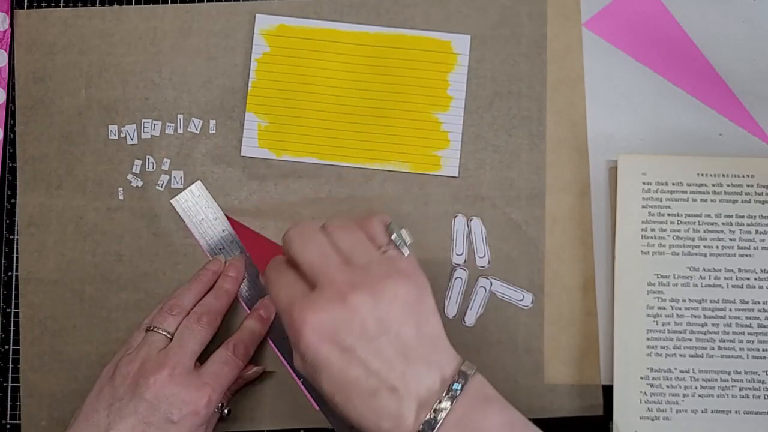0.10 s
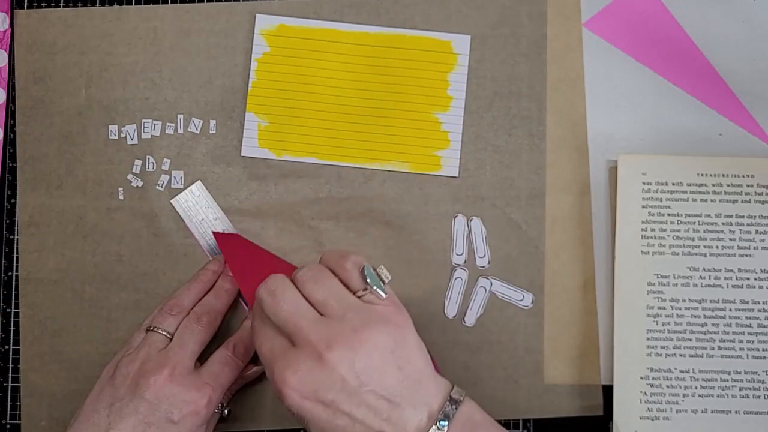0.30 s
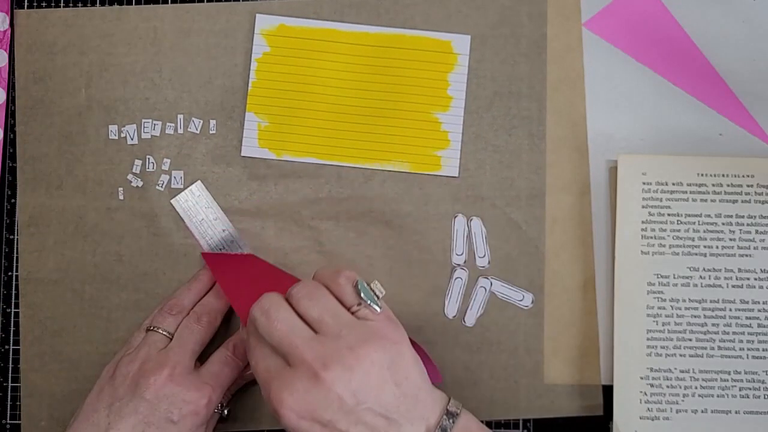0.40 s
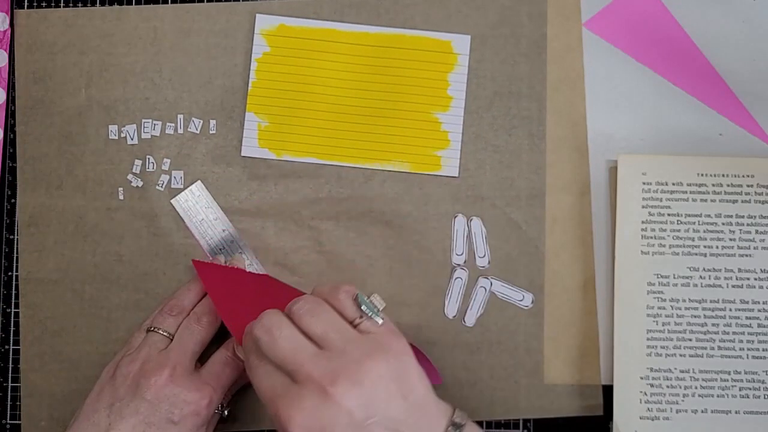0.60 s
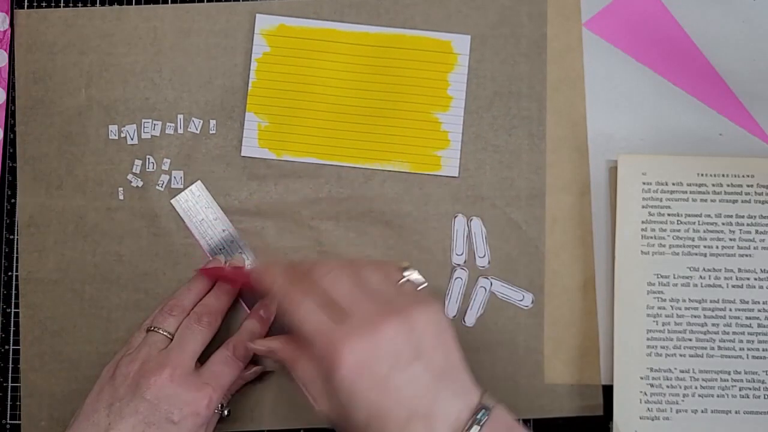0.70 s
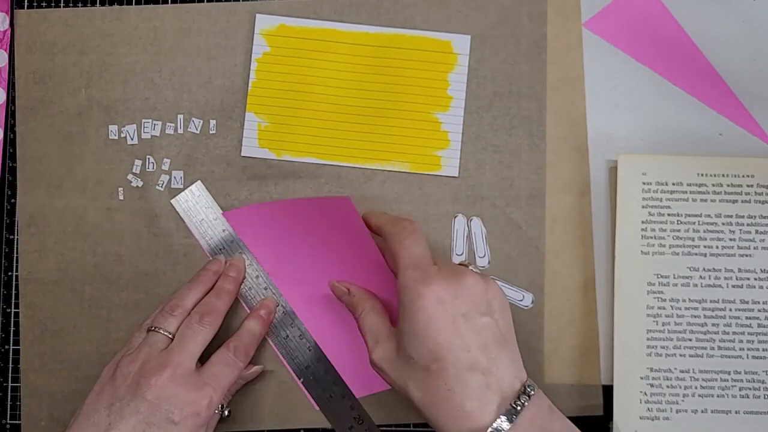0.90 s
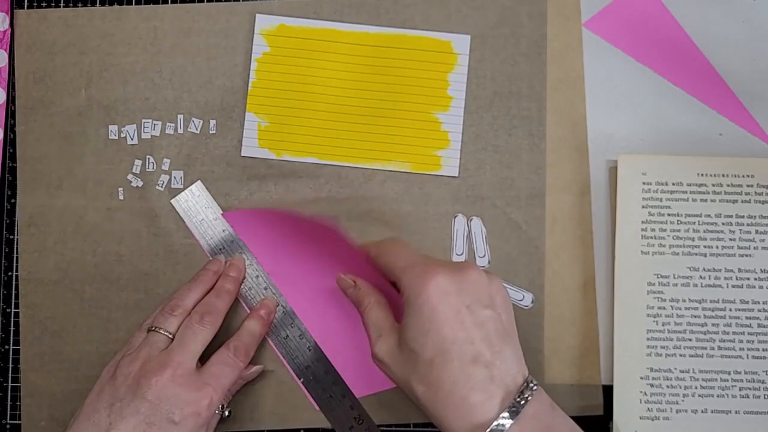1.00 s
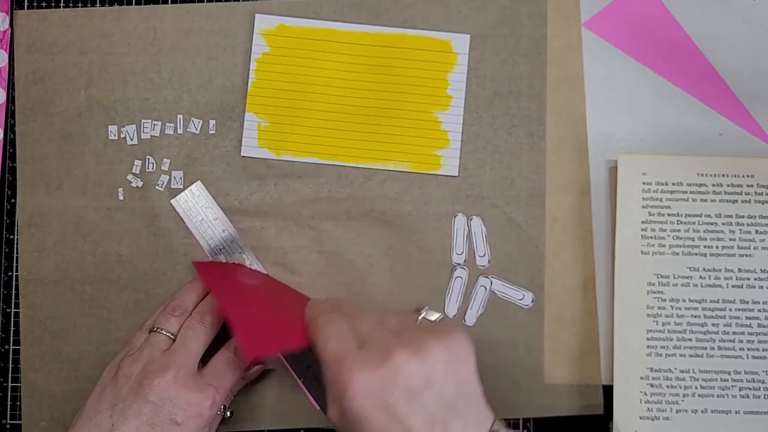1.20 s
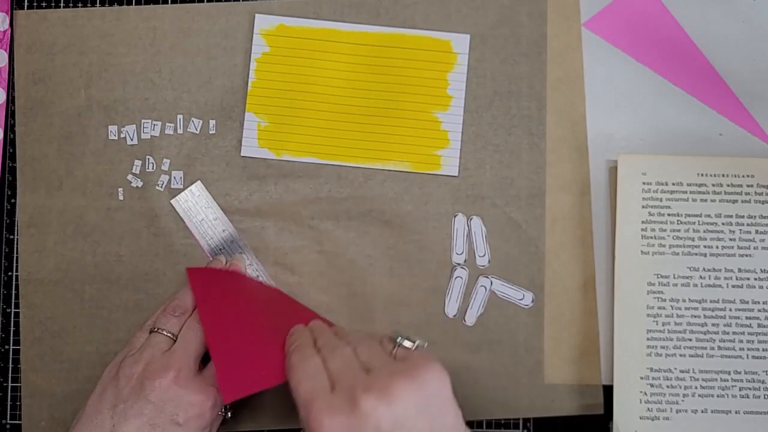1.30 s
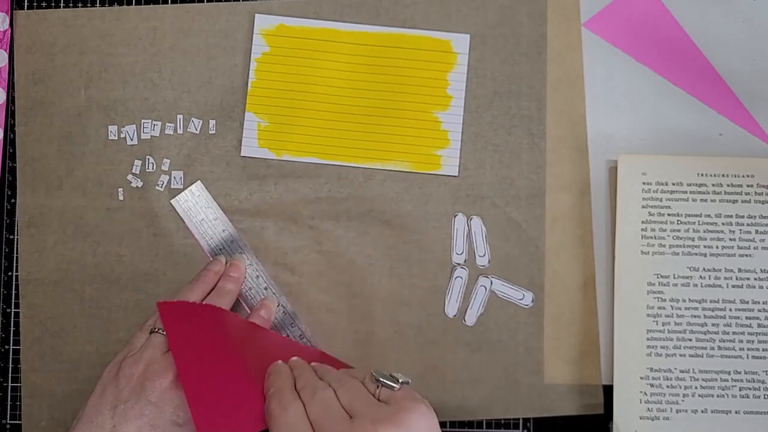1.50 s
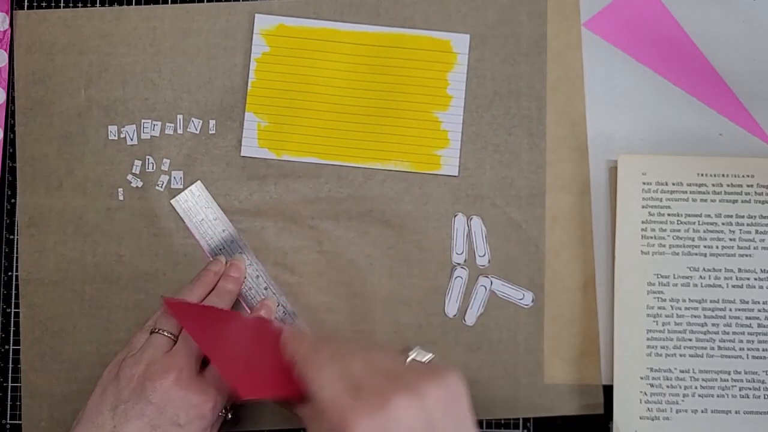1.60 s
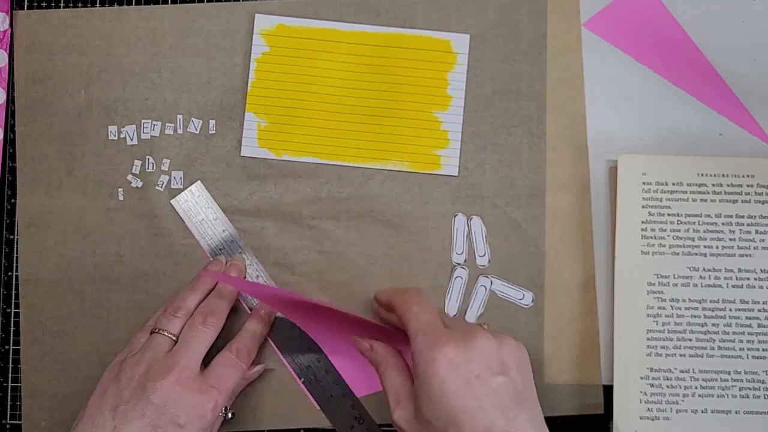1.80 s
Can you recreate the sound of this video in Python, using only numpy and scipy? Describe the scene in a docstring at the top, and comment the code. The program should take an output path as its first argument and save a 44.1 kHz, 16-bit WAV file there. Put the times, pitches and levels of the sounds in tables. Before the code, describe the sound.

Paper tearing in quick short rips, a quiet fumble of handling, then one longer rip

```python
"""At a craft table a sheet of paper is torn along a steel ruler: four short rips, a change of grip, a long pull.
Random clicks are the snapping fibres, filtered by the loose flap; single clicks are whole bundles giving way.
Dying bursts of clicks are the buckling sheet; denser clicks are it sliding under fingers and over the table.
A close pair of microphones adds scatter, room decay and table resonances; filtered noise is the room and rumble."""
import sys
import numpy as np
from scipy import signal
from scipy.fft import rfft, irfft, next_fast_len
from scipy.io import wavfile
from scipy.ndimage import uniform_filter1d

SR = 44100
rng = np.random.default_rng(int(sys.argv[2]) if len(sys.argv) > 2 else 0)


def store_pcm(level_fs):
    """Save levels as 16-bit WAV."""
    pcm = np.round(np.clip(level_fs, -1, 1) * 32767).astype(np.int16)
    wavfile.write(sys.argv[1], SR, np.atleast_2d(pcm).T)


N = 81585

T = np.arange(N) / SR
FFT_SIZE = 2 * next_fast_len(N // 2 + SR // 10, True)
HZ = np.arange(FFT_SIZE // 2 + 1) * SR / FFT_SIZE

# Force of each rip, shared with the list of rips. Each row: time [s], level before the rip's gain [dB].
FIRST_NICK = [(0.14, -71), (0.165, -64.5), (0.185, -53), (0.205, -43), (0.212, -37.5), (0.226, -50),
              (0.245, -84)]
FIRST_RIP = [(0.256, -51), (0.272, -34.5), (0.298, -36.5), (0.313, -29), (0.335, -33.5), (0.354, -28.5),
             (0.37, -35.5), (0.385, -43), (0.408, -63)]
SECOND_RIP = [(0.413, -32.5), (0.428, -30.5), (0.455, -31), (0.477, -34.5), (0.495, -48), (0.512, -42.5)]
THIRD_RIP = [(0.519, -44), (0.531, -39.5), (0.539, -32), (0.595, -35), (0.617, -40.5), (0.63, -56.5),
             (0.652, -46.5), (0.675, -98)]
LONG_PULL = [(1.326, -33.5), (1.334, -54), (1.339, -32.5), (1.356, -32), (1.40, -31), (1.42, -33),
             (1.46, -32.5), (1.485, -26), (1.505, -32), (1.55, -37), (1.602, -41.5), (1.63, -58),
             (1.66, -66)]
# Colour of the loose flap as it grows, shared between rips. Each row: frequency [Hz], relative density [dB per Hz].
SHORT_FLAP = [(60, -9), (350, -10.5), (650, -0.5), (1050, -6), (1500, 0.5), (2100, 2.5), (3100, 1),
              (5000, 1.5), (7400, 1), (8500, -5), (12500, -2.5), (16000, -5.5)]
GROWN_FLAP = [(60, -4), (350, 1), (520, 10.5), (850, 5), (1350, 9), (2100, 10.5), (2550, 7.5), (3900, 10),
              (5000, 8), (7300, 8.5), (8600, 0.5), (12400, 7), (16000, -1.5)]
LONG_FLAP = [(60, -20.5), (150, -8), (350, -6.5), (680, -1.5), (1100, -4.5), (2000, -3), (3000, 0.5),
             (6200, -4), (7800, -1.5), (8500, -8.5), (12000, -7.5), (16000, -3)]

FIBRES_PER_S, FULL_FORCE_DB = 3000, -31  # snapping rate at full force
RATE_FOLLOWS = 0.36  # exponent of rate against force
FIBRE_SPREAD_DB, BOOM_BELOW_HZ = 2, 780
SNAP_Q, SNAP_DULL_HZ = 1.15, 8000
CRINKLES_PER_S, CRINKLE_SPREAD_DB = 3400, 3  # tiny creases within a pop
POP_EDGE_DB, POP_GAIN_DB = -52, -1
SWEEP_HALF_WIDTH_OCT = 0.48
FLEX_SWING_DB, FLEX_WIDTH_HZ, FLEX_S = 4, 49, 0.035  # RMS swing, smoothing over frequency and time
LEFT_LEAD_S = 0.000099
APART_ABOVE_HZ, BASS_APART = 1320, 0.15  # scatter differs between sides; share in the deep bass
SCATTER_DB, SCATTER_T60_S = 2, 0.023
ROOM_DB, ROOM_T60_S = -1.5, 0.16
TABLE_Q = 37
FLOOR_GAIN_DB = -70.5
CUTOFF_HZ = 15780


def from_db(db):
    """Decibels to gain."""
    return 10 ** (np.asarray(db) / 20)


def rms_one(x):
    """Scale to unit power."""
    return x / np.sqrt(np.mean(x ** 2) + 1e-20)


def level(curve):
    """Gain along a level curve, closing with a 1 ms time constant outside it."""
    s, db = np.transpose(curve)
    outside_s = np.maximum(s[0] - T, 0) + np.maximum(T - s[-1], 0)
    return from_db(np.interp(T, s, db)) * np.exp(-outside_s * 1000)


def swell(centre_s, length_s):
    """Gaussian rise and fall; the length is its standard deviation."""
    return np.exp(-.5 * ((T - centre_s) / length_s) ** 2)


def gains(points):
    """Gain per frequency bin, interpolated in dB over log frequency."""
    hz, db = np.transpose(points)
    return from_db(np.interp(np.log(HZ + 1), np.log(hz), db))


def colour(x, points):
    """Minimum-phase filter with the given spectrum; white noise keeps its power."""
    cepstrum = irfft(np.log(rms_one(gains(points))))
    # fold onto positive time: causal
    cepstrum[1:FFT_SIZE // 2] *= 2
    cepstrum[FFT_SIZE // 2 + 1:] = 0
    response = np.exp(rfft(cepstrum))
    return irfft(rfft(x, FFT_SIZE) * response)[..., :N]


def low_pass(x, hz, order=2):
    """Butterworth low-pass."""
    sos = signal.butter(order, min(hz, .45 * SR), fs=SR, output="sos")
    return signal.sosfilt(sos, x + 1e-18)


def high_pass(x, hz, order=2):
    """Butterworth high-pass."""
    sos = signal.butter(order, min(hz, .4 * SR), "high", fs=SR, output="sos")
    return signal.sosfilt(sos, x + 1e-18)


def resonance(x, hz, width_hz):
    """Two-pole resonance, gain about 1 at its peak."""
    r = np.exp(-np.pi * width_hz / SR)
    zeros = (1 - r * r) / 2 * np.array([1, 0, -1])
    poles = [1, -2 * r * np.cos(2 * np.pi * hz / SR), r * r]
    return signal.lfilter(zeros, poles, x + 1e-18)


def crackle(per_s, spread_db):
    """Random clicks of uneven size and either sign, at about unit power."""
    chance = np.clip(per_s / SR, 1e-3, 1)
    sizes = rms_one(from_db(spread_db * np.minimum(rng.exponential(1, N), 4)))
    signed = sizes * rng.choice([-1, 1], N)
    return signed * (rng.random(N) < chance) / np.sqrt(chance)


def tearing():
    """Fibres snap at random, faster and louder with force; the flap colours them and rings briefly when taut."""
    # Each row: force curve, flap colour, gain [dB], boom setting at the start [dB], at the end [dB].
    rips = [(FIRST_NICK, SHORT_FLAP, -3.2, -0.69, 0.018), (FIRST_RIP, SHORT_FLAP, -2.54, -3.2, 1),
            (SECOND_RIP, GROWN_FLAP, -2.4, -1.4, 3.8), (THIRD_RIP, GROWN_FLAP, -1.74, -0.098, 4.4),
            (LONG_PULL, LONG_FLAP, -2.73, 0.87, 1)]
    # Taut flap. Each row: centre [s], length [s], frequency [Hz], width [Hz], gain before halving [dB].
    rings = [(0.26, 0.0057, 615, 150, 11), (0.356, 0.049, 7450, 250, 9.5), (0.329, 0.017, 4160, 400, 7),
             (0.35, 0.014, 1074, 80, 14.5), (0.357, 0.013, 3070, 130, 14), (0.465, 0.037, 1830, 900, -1),
             (0.56, 0.038, 3690, 110, 8), (0.595, 0.028, 1170, 350, 10), (1.36, 0.023, 1760, 1010, 9),
             (1.39, 0.028, 786, 242, 10.5), (1.492, 0.053, 2920, 200, 6.5), (1.574, 0.042, 7580, 400, 8)]
    torn = 0
    for curve, flap, gain_db, start_db, end_db in rips:
        force = level(curve)
        per_s = FIBRES_PER_S * (force / from_db(FULL_FORCE_DB)) ** RATE_FOLLOWS
        fibres = crackle(per_s, FIBRE_SPREAD_DB)
        rip = colour(space(fibres * force), flap)
        boom = from_db(np.interp(T, [curve[0][0], curve[-1][0]], [start_db, end_db]))
        lows = low_pass(rip, BOOM_BELOW_HZ, order=1)
        highs = rip - lows
        torn = torn + from_db(gain_db) * (lows * boom + highs / np.sqrt(boom))
    ringing = 0
    for s, length_s, hz, width_hz, db in rings:
        ringing = ringing + resonance(torn * swell(s, length_s), hz, width_hz) * from_db(db) / 2
    return torn + ringing


def snaps():
    """A bundle of fibres gives way: one click and its scatter excite a broad resonance of the sheet."""
    # Each row: start [s], click level before filtering [dB], resonance [Hz].
    bundles = [(0.524, -8.5, 1310), (0.646, -11.5, 1450), (1.2922, -7, 1300), (1.3362, -5, 2200),
               (1.352, -1, 1910), (1.36, -7, 1110), (1.485, -2.5, 794)]
    out = 0
    for s, db, hz in bundles:
        click = from_db(db) * (np.arange(N) == int(s * SR))
        out = out + resonance(space(click), hz, hz / SNAP_Q)
    return low_pass(out, SNAP_DULL_HZ)


def pops():
    """The sheet buckles or is tapped: a sudden, quickly dying crumple with a faint crisp edge."""
    # Each row: start [s], level before gain and filters [dB], thin below [Hz], dull above [Hz], crumple T60 [s].
    buckles = [(0.181, -38, 900, 11800, 0.012), (0.266, -31, 500, 1690, 0.021),
               (0.411, -32, 820, 2670, 0.078), (0.536, -27.5, 606, 4930, 0.031),
               (0.611, -31, 890, 1650, 0.0047), (0.704, -56, 249, 3400, 0.16),
               (0.756, -46, 530, 4050, 0.089), (0.806, -41.5, 540, 3420, 0.019),
               (1.061, -60, 1470, 8800, 0.059), (1.115, -46.5, 566, 3500, 0.092),
               (1.207, -46.5, 380, 2650, 0.087), (1.243, -43.5, 520, 2400, 0.043),
               (1.323, -32.5, 500, 5060, 0.027)]
    # Each row: frequency [Hz], relative gain [dB].
    pop_colour = [(60, 5.5), (350, -3.5), (680, 4), (1000, -5), (1500, 5), (2500, 0)]
    out = 0
    for s, db, thin_hz, dull_hz, t60_s in buckles:
        dying = (T >= s) * from_db(-60 * np.clip((T - s) / t60_s, 0, 2))
        burst = space(crackle(CRINKLES_PER_S, CRINKLE_SPREAD_DB) * dying)
        edged = low_pass(burst, dull_hz, order=4) + from_db(POP_EDGE_DB) * burst
        pop = rms_one(edged) * np.sqrt(2 * np.mean(dying ** 2))
        out = out + from_db(db + POP_GAIN_DB) * high_pass(pop, thin_hz)
    return colour(out, pop_colour)


def handling():
    """Friction as fine clicks under the fingers; band-passed swells as hand and flap brush the table."""
    # Finger friction. Each row: time [s], level [dB].
    slide = [(.66, -108), (.72, -59), (.745, -74), (.80, -64), (.86, -73), (.89, -57.5), (.915, -71),
             (.96, -75.5), (1.03, -83), (1.055, -79), (1.08, -65.5), (1.13, -74.5), (1.18, -77.5),
             (1.22, -60), (1.27, -77), (1.66, -72), (1.77, -73), (1.82, -81), (1.85, -70)]
    # Each row: frequency [Hz], relative density [dB per Hz].
    slide_colour = [(100, -14), (450, 0), (1100, -15.5), (1600, -2), (2800, -1), (5000, -1), (7500, -2),
                    (9000, -10.5), (12500, -8.5), (16000, -13)]
    # Brushes. Each row: centre [s], length [s], level before filtering [dB], band centre [Hz].
    sweeps = [(0.797, 0.014, -51, 2100), (0.869, 0.033, -59.5, 12100), (0.892, 0.0082, -54.5, 1810),
              (0.958, 0.047, -71.5, 2500), (1.23, 0.031, -58, 160), (1.254, 0.017, -55, 780),
              (1.642, 0.008, -61.5, 1100), (1.71, 0.017, -59, 970)]
    out = colour(space(level(slide) * crackle(per_s=5600, spread_db=8.5)), slide_colour)
    grain = crackle(per_s=1300, spread_db=4.5)
    edge = 2 ** SWEEP_HALF_WIDTH_OCT
    for s, length_s, db, hz in sweeps:
        brush = space(grain * from_db(db) * swell(s, length_s))
        band = high_pass(low_pass(brush, hz * edge, order=3), hz / edge)
        out = out + band * np.sqrt(SR / 2 / (hz * edge))  # offset the low-pass loss
    return out


def flex(x):
    """The sheet bends, so narrow resonances come and go, partly differently toward each microphone."""
    hz, s, frames = signal.stft(x, SR, nperseg=1024, noverlap=768)
    field = rng.standard_normal((3,) + frames.shape[1:])
    for axis, steps in ((1, FLEX_WIDTH_HZ / hz[1]), (2, FLEX_S / s[1])):
        kernel = np.exp(-2 * (np.arange(-40, 41) / steps) ** 2)
        kernel = np.expand_dims(kernel, (0, 3 - axis))
        field = signal.fftconvolve(field, kernel, "same", axes=axis)
    gain = from_db(FLEX_SWING_DB * rms_one(field[:2] + field[2]))  # own part plus shared part
    gain /= np.sqrt(uniform_filter1d(gain ** 2, size=25, axis=1))  # keep the broad balance
    return signal.istft(frames * gain, SR, nperseg=1024, noverlap=768)[1][:, :N]


def linger(power, t60_s):
    """Energy dying away exponentially."""
    keep = from_db(-60 / (t60_s * SR)) ** 2
    return signal.lfilter([0, 1 - keep], [1, -keep], power + 1e-18)


def space(x):
    """Sound reaches the left microphone first; noise-like echoes are mostly alike on both sides in the bass."""
    hz = np.arange(N + 1) * SR / (2 * N)
    delay = np.exp(-2j * np.pi * hz * LEFT_LEAD_S)
    direct = np.array([x, irfft(rfft(x, 2 * N) * delay)[:N]])
    apart = np.clip(BASS_APART + (hz / APART_ABOVE_HZ) ** 2 / 2, 0, 1)
    white = rfft(rng.standard_normal((3, 2 * N)))
    cloud = irfft(np.sqrt(1 - apart) * white[2] + np.sqrt(apart) * white[:2])[:, :N]
    scatter = from_db(SCATTER_DB) ** 2 * linger(x ** 2, SCATTER_T60_S)
    room = from_db(ROOM_DB) ** 2 * linger(x ** 2, ROOM_T60_S)
    return direct + cloud * np.sqrt(scatter + room)


def table_echoes(x, peaks):
    """Table reflections favour a few fixed frequencies, added as narrow resonances."""
    return x + sum((from_db(db) - 1) * resonance(x, hz, hz / TABLE_Q) for hz, db in peaks)


def background():
    """Low room hum and faint hiss, partly shared by both sides, with the table's rumble: all filtered noise."""
    # Each row: frequency [Hz], relative density [dB per Hz].
    floor_colour = [(30, -47), (43, 2), (56, 3), (75, -10), (110, -13.5), (200, -28), (500, -31),
                    (2000, -39.5), (16000, -48)]
    # Table under the hands. Each row: time [s], level [dB].
    rumble = [(0, -72.5), (1.1, -85), (1.25, -83), (1.56, -51), (1.85, -74)]
    # Each row: frequency [Hz], relative gain [dB].
    rumble_colour = [(25, -25), (52, 3.5), (90, -19.5), (150, -17), (400, -49)]
    white = rng.standard_normal((4, N))
    floor = from_db(FLOOR_GAIN_DB) * colour(white[0] + 1.14 * white[1:3], floor_colour)
    return floor + level(rumble) * colour(white[3], rumble_colour)


def scene():
    """Tearing and rubbing pass the bending sheet; pops and snaps stay crisp; the background skips the table."""
    # Table reflections toward each microphone. Each row: frequency [Hz], peak gain [dB].
    left_peaks = [(1275, 7.5), (1475, 11), (2150, 3.5), (3830, 3)]
    right_peaks = [(690, 8.1), (965, 4.7), (1085, 4.8), (1900, 1.33), (4330, 2.8)]
    left, right = flex(tearing() + handling()) + pops() + snaps()
    paper = np.array([table_echoes(left, left_peaks), table_echoes(right, right_peaks)])
    return paper + background()


def record(dry):
    """Each microphone has its own colour; a steep low-pass cuts the top."""
    # Each row: frequency [Hz], left minus right [dB].
    balance = [(50, -5.5), (130, -1.5), (300, 1), (800, -2), (1900, -1.5), (2700, 2.5), (6200, -3.5),
               (8400, 0.5), (16000, -1)]
    tilt = np.sqrt(gains(balance))  # half the difference to each side
    top = 1 / np.sqrt(1 + (HZ / CUTOFF_HZ) ** 300)
    return irfft(rfft(dry, FFT_SIZE) * np.array([tilt, 1 / tilt]) * top)[:, :N]


dry = scene()
out = record(dry)
store_pcm(out)
```